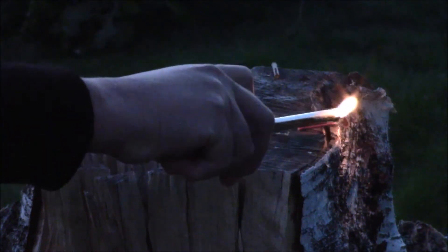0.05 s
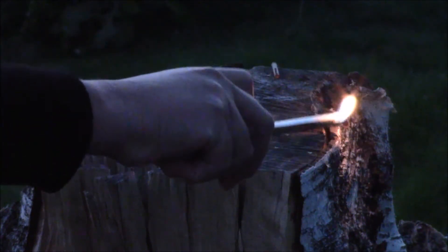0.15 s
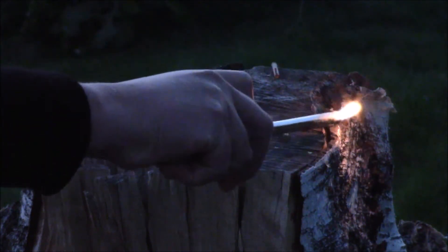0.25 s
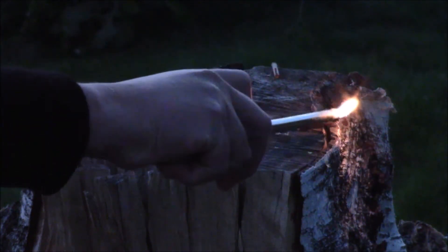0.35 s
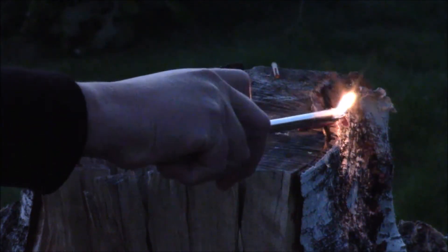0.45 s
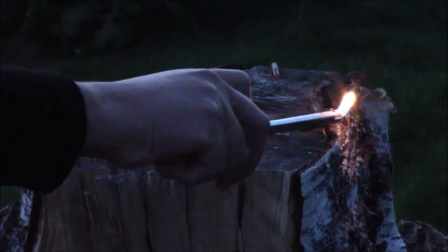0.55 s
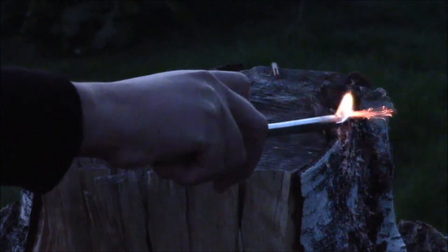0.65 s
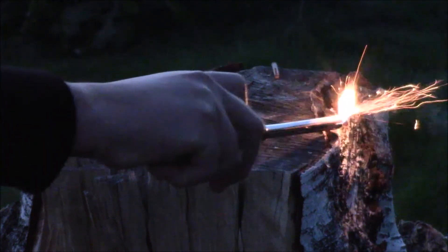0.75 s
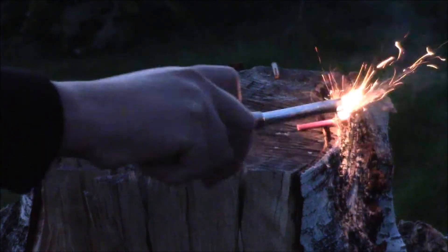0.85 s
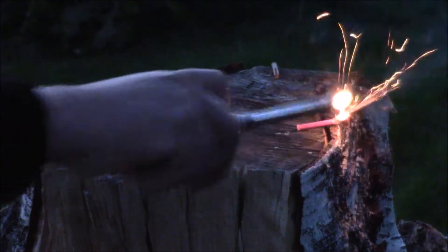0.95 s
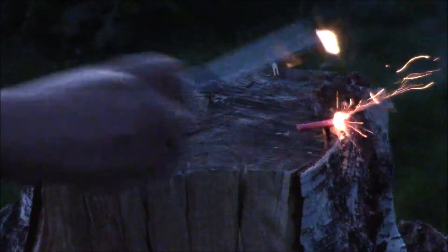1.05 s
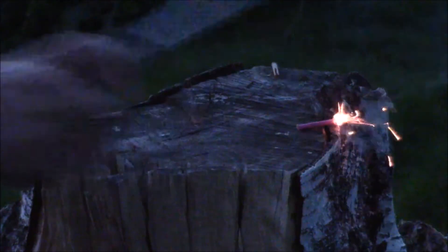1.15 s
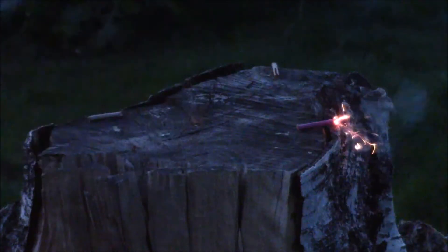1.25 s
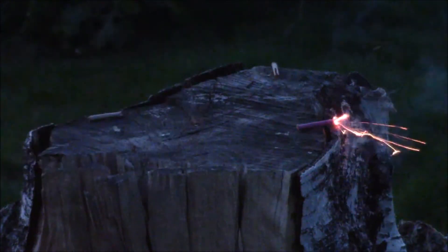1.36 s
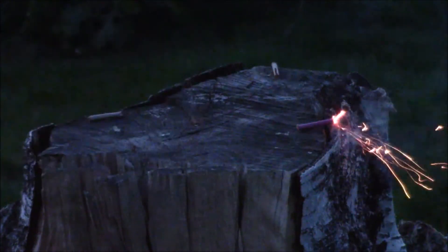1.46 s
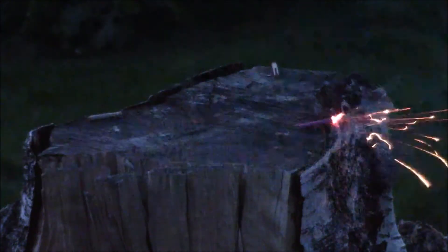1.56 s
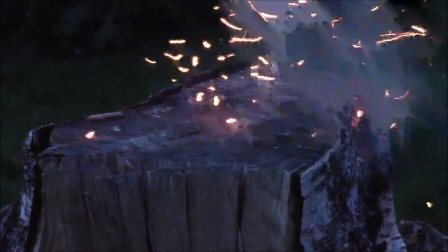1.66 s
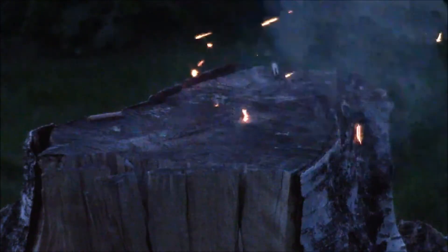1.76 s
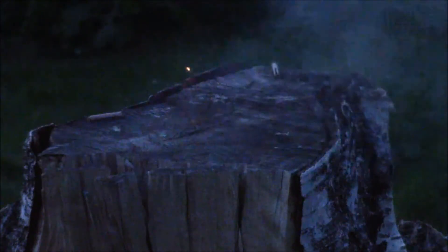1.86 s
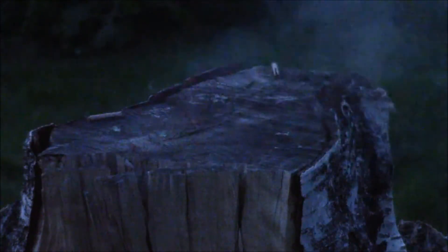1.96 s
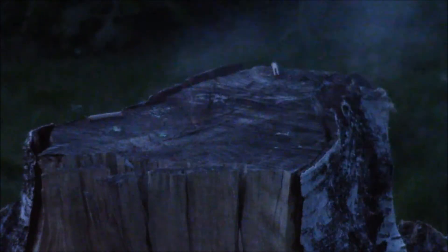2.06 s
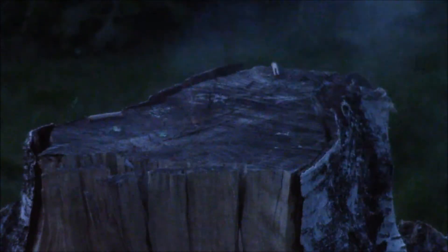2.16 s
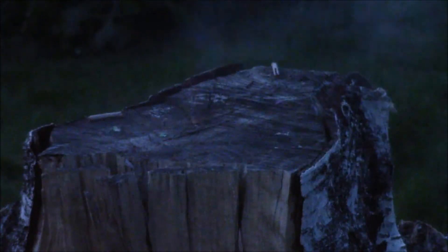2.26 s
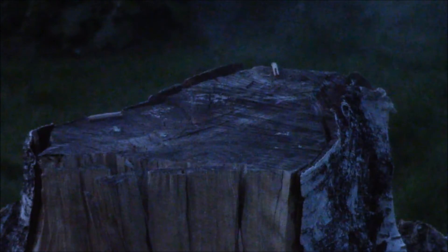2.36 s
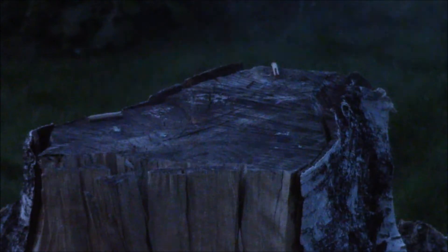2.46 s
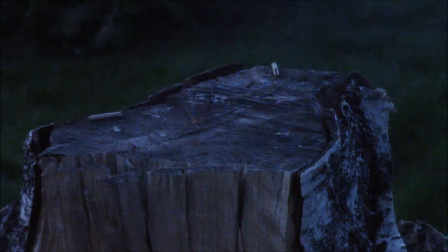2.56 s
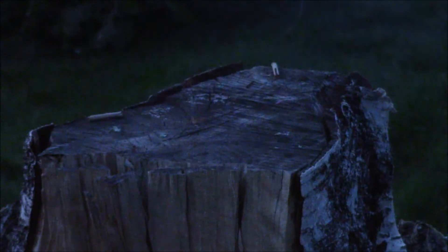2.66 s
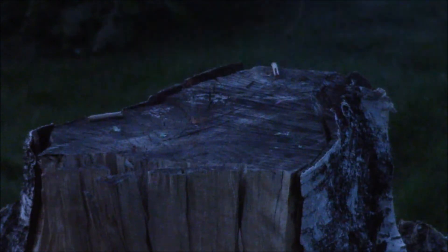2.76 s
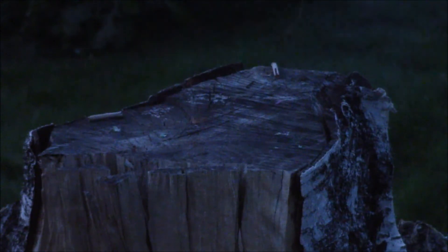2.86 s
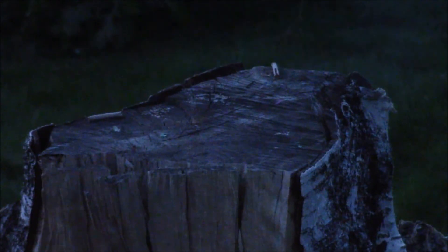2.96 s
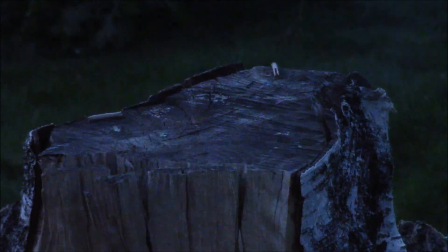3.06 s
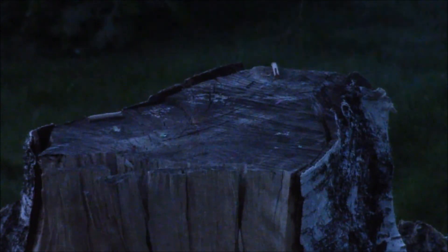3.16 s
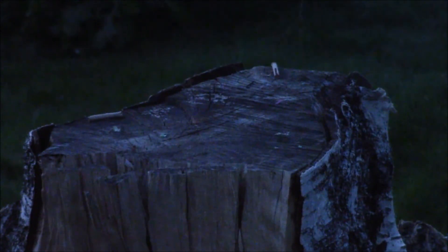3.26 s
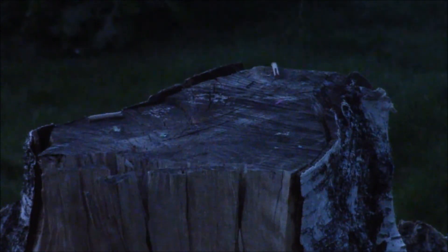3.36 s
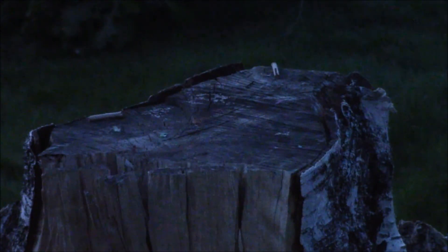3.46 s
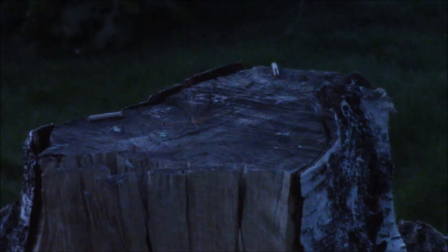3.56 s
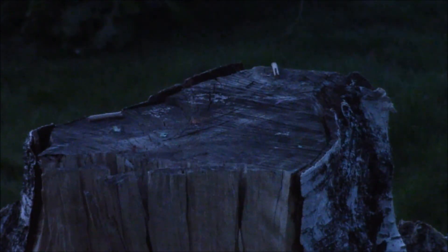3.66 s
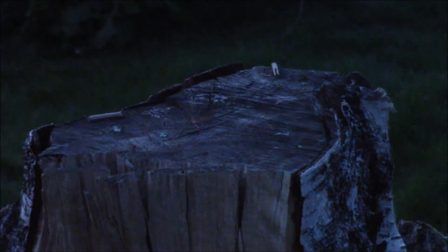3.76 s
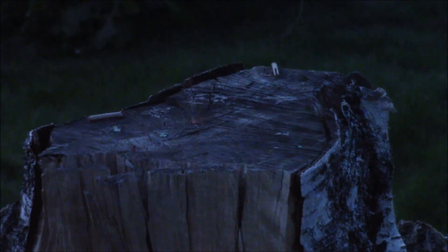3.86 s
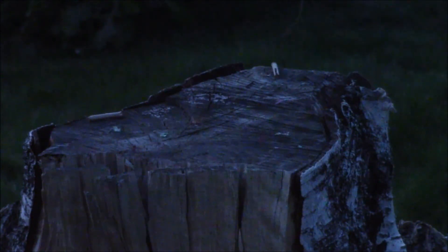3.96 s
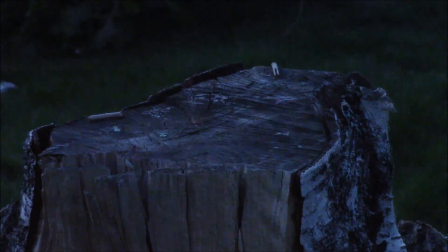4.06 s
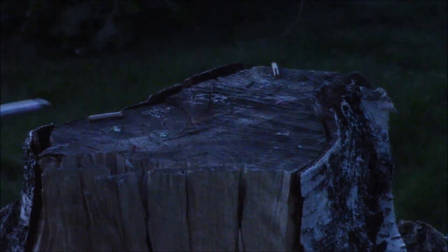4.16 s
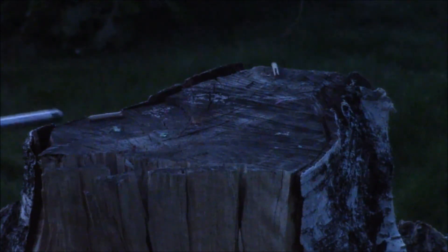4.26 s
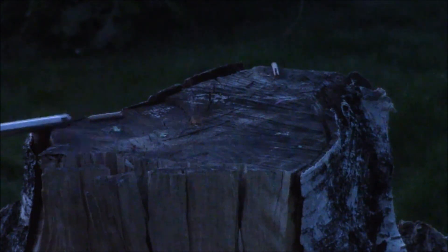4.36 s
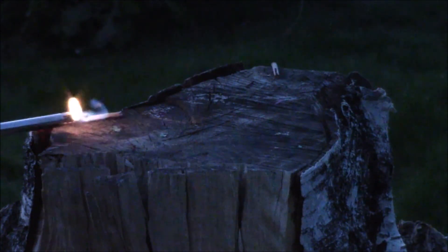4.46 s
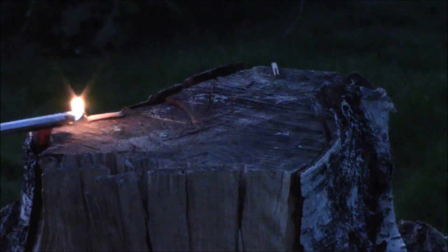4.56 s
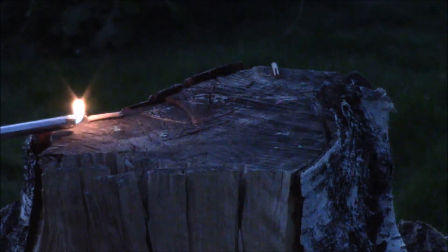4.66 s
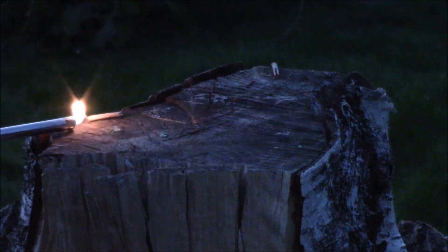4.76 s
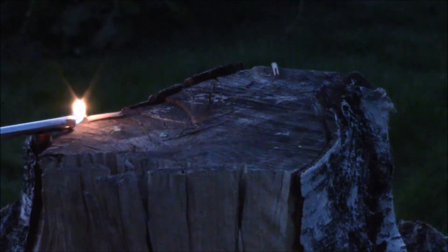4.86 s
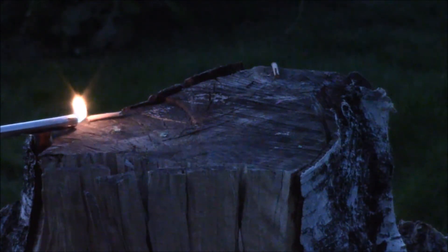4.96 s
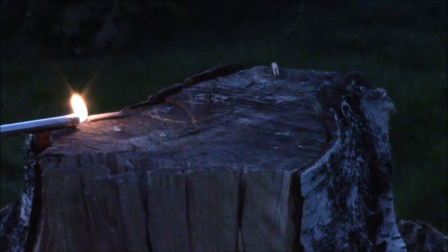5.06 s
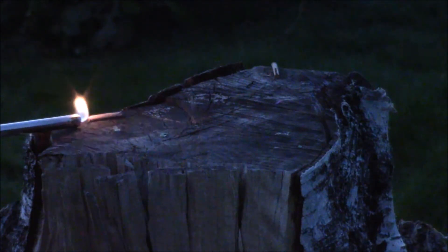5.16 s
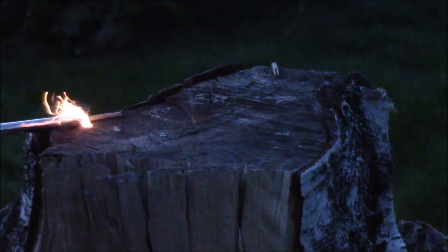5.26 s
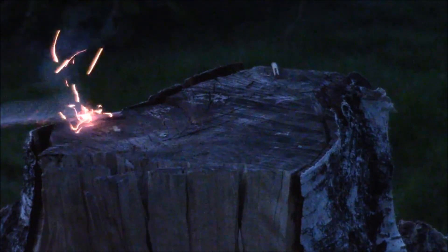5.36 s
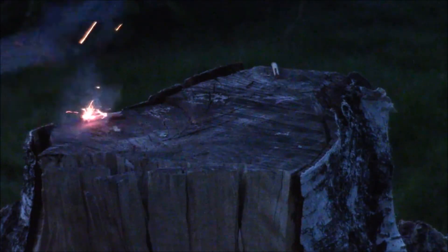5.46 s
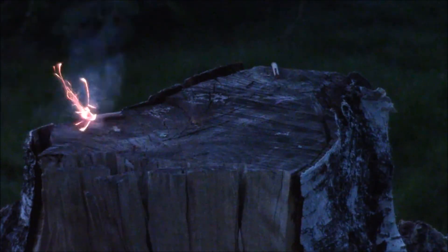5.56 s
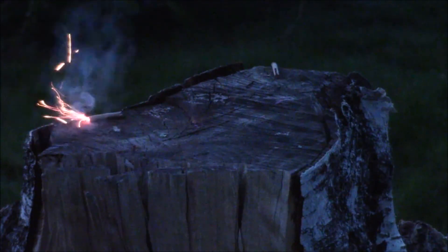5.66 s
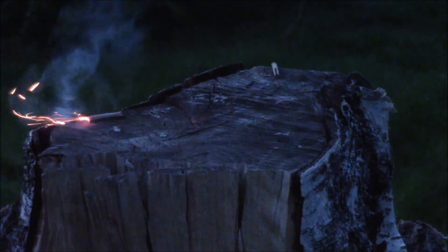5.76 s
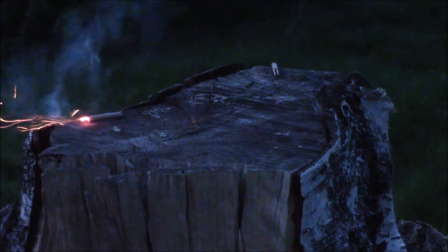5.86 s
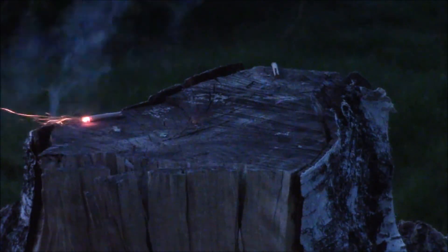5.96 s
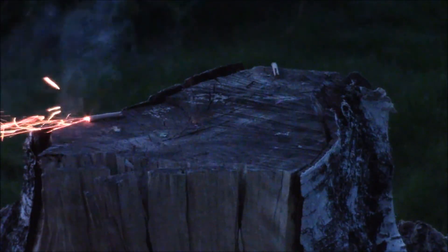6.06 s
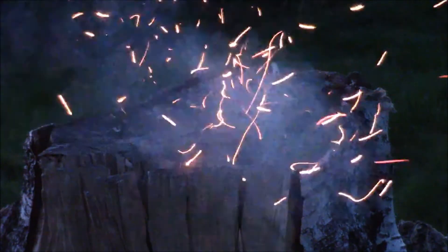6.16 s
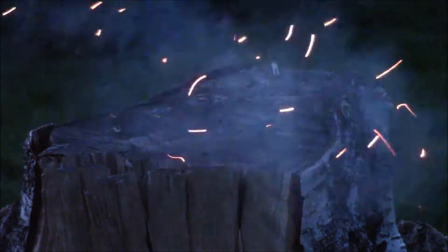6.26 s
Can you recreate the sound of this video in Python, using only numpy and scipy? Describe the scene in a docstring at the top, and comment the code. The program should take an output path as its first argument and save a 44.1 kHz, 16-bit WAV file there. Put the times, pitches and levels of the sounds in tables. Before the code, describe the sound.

Two firecrackers outdoors, each a sputtering bright fuse hiss ending in a sharp overloaded crack with slapping echoes, separated by quiet and lighter clicks.

```python
"""Two firecrackers in a garden

Two small firecrackers on a tree stump. Each fuse is a jet of shaped noise with spits; each blast is a pressure
front, a ground heave and scattered noise that overloads the recorder, with a brief pre-echo. Walls and trees return
slaps and a dulling roll. Between the blasts a gas lighter clicks as ringing modes; dry ticks sound nearby, far
traffic hums below."""
import sys
import numpy as np
from scipy import signal
from scipy.io import wavfile

SR = 44100
rng = np.random.default_rng(int(sys.argv[2]) if len(sys.argv) > 2 else 0)


def log_audio(samples):
    """Write samples as a 16-bit WAV file to the path given in sys.argv[1]."""
    # one column per channel
    frames = np.atleast_2d(samples).T
    # limit to full scale, then quantise
    limited = np.clip(frames, -1, 1)
    pcm = np.round(limited * 32767).astype(np.int16)
    wavfile.write(sys.argv[1], SR, pcm)


def gain_from_db(level_db):
    """Convert decibel levels to linear amplitude factors (20 dB per decade)."""
    decades = np.asarray(level_db, float) / 20
    return 10 ** decades


N = 277973
SIDES = np.array([[1], [-1]])   # left, right

# left-right likeness of far and near sound: f/Hz, likeness/0..1
FAR_LIKENESS = [(60, 1), (240, 0.6), (950, 0.82), (3770, 0.65), (15000, 0.59)]
NEAR_LIKENESS = [(60, 1), (240, 0.87), (950, 0.987), (3770, 0.9445), (15000, 1)]

# far traffic spectrum: f/Hz, density/dB per Hz (relative)
TRAFFIC_SPECTRUM = [(26, -32.5), (45, -1.5), (120, -4.5), (250, -6), (440, -4), (498, -6.5), (606, -5),
                    (813, -5.5), (942, -7), (2390, -18), (6700, -23), (15800, -30.5)]
# far cars passing: t/s, half length/s, level near tyre pitch/dB, level over all/dB
CAR_PASSES = [(0.357, 0.192, 8.5, 0), (2.7, 0.87, -0.5, 1.5), (6.3, 2.2, 3.5, 0.5)]
TRAFFIC_DB, TYRE_HZ, TYRE_OCTAVES = -52, 900, 0.19

# faint dry ticks nearby: t/s, peak/dB
TICKS = [(0.5053, -39.5), (2.948, -42), (3.1667, -39), (3.2281, -39.5), (3.3665, -45), (3.5019, -43),
         (3.5985, -43.5), (4.2374, -38.5), (4.2996, -45), (4.9899, -47)]
TICK_HZ, TICK_T60_S = 4150, 0.0173

# burning fuses: lit/s, out/s, first flare/dB, steady burn/dB, climb towards the charge/dB per s
FUSES = [(0.719, 1.63, -52, -65.5, 13), (5.266, 6.137, -50.5, -64.5, 7)]
# jet hiss and roar spectra: f/Hz, density/dB per Hz (relative)
HISS_SPECTRUM = [(3500, -24), (4700, -9), (6700, 5), (9500, 5), (13400, -7), (17000, -7)]
ROAR_SPECTRUM = [(900, -8.5), (1600, -3), (2500, -2.5), (4000, -4), (6000, -21)]
# jet flares where the powder is richer: t/s, length/s, level/dB
FLARES = [(1.456, .04, 9.5), (5.699, 0.354, 4.5), (6.039, .1, 10)]
# fuse spits: t/s, peak/dB, centre f/Hz
SPITS = [(.8445, -33.5, 2820), (.8894, -41.5, 2230), (.914, -41.5, 1900), (0.9947, -33, 2270),
         (1.0944, -29, 3290), (1.099, -28.5, 2270), (1.122, -32.5, 5500), (1.138, -32, 2580),
         (1.4735, -44, 5000), (1.5064, -36, 2200), (1.5385, -39, 2790), (5.273, -37, 3121),
         (5.41, -34, 2050), (5.5056, -30.5, 1330), (5.567, -29, 2770), (5.6375, -34.5, 1900),
         (5.827, -43, 1820), (6.02, -38.5, 2210), (6.038, -40, 2250)]
CATCH_S, FIRST_FLARE_T60_S, FLARE_EDGE_S, SPIT_T60_S = 0.01, 2.754, 0.012, 0.049
ROAR_DB, ROAR_FADE_DB_PER_S, AIRY_DB_PER_OCTAVE_S = -1, 6.5, 11.5

# pre-echo, bright noise smeared ahead of each bang: end t/s, end level/dB, rise/dB per s
PRE_ECHOES = [(1.6391, -11, 898.5), (6.1457, -14, 3500)]
# pre-echo spectrum: f/Hz, density/dB per Hz (relative)
PRE_ECHO_SPECTRUM = [(600, -5.5), (1500, -3), (3500, 1.5), (6000, -3), (10500, -1), (13000, -2.5),
                     (15500, -14)]

# blasts: t/s, pressure/dB, positive phase/ms, lean/dB (left +, right -), all that is thrown back/dB
BLASTS = [(1.6397, 33, 0.5, -1.5, 0), (6.1472, 29.5, .33, 5, -1)]
# ground heave after each blast: level/dB, f/Hz, lean/dB (left +, right -)
HEAVES = [(22, 53, -0.5), (7.96, 74, -1.5)]
# noise thrown off stump and ground: f/Hz, density/dB per Hz (relative)
SCATTER_SPECTRUM = [(150, -5), (500, -1), (1500, 2.5), (3000, -5), (6000, -10.5), (11000, -15.5),
                    (16000, -26)]
SCATTER_DB, SCATTER_T60_S = 25, 0.06

# hard surfaces returning slaps: delay/s, level/dB
SLAPS = [(.0518, 5), (0.0549, 3), (0.0717, 12.5), (.0815, 8), (.085, 11), (0.0897, 8.5), (.1, -1.5),
         (.1235, -8), (.1724, 0.5), (.179, -7.5), (.204, -18.5), (.234, -11), (.413, -26.5)]
# hedges, trees, far walls: delay of top/s, level/dB, rise over 60 dB/s, t60/s, treble tilt/dB per octave
THICKETS = [(.015, -8, 0.62, .045, 0), (.045, -14.5, 0.39, .33, 11.5), (.075, -6.5, 0.04, .2, -3.5),
            (.176, -19.5, 0.2442, .08, -9), (.207, -22, 0.09, 0.1521, -2.5), (.236, -20.5, 0.34, .23, 5),
            (.3, -34.5, 1, 1.6, 1), (0.598, -46.5, 3.0, 4.52, -2.5), (.92, -52.5, 0.02, 0.53, 16)]
# echo roll spectrum: f/Hz, density/dB per Hz (relative)
ROLL_SPECTRUM = [(35, -47), (60, -25), (210, -20.5), (291, -21), (1120, -7.5), (1830, -7.5), (2470, -8.5),
                 (7030, -24.5), (12000, -41), (15500, -69)]
AIR_DB_PER_OCTAVE_S = 15.5   # treble loss grows with travel time

# lighter trigger, spark snap, after-rattle: t/s, contact level/dB, steady part/s, t60/s
LIGHTER_SNAPS = [(4.3406, -29.5, 0.00073, 0.0238), (4.4732, -15, .005, 0.013),
                 (4.4846, -47.5, 0.0015, 0.118)]
# plastic and metal body of the lighter: f/Hz, level/dB, t60/s
LIGHTER_MODES = [(1040, -14.5, 0.0069), (1405, -8, 0.00507), (2175, -6, 0.0116), (3125, -35.5, 0.099),
                 (3336, -11.5, 0.0042), (4397, -9, 0.00526), (5914, -9, 0.00312), (7690, -6.5, 0.00261),
                 (9820, -5, 0.00196), (12930, -7, 0.00089)]

LIMIT_DB, ATTACK_S, RELEASE_DB_PER_S = -3, 0.0037, 250
TOP_HZ, OFFSET = 16200, 0.0091


def rms_one(x):
    """Scale to rms 1."""
    return x / np.sqrt(np.mean(x ** 2) + 1e-20)


def at_hz(points, hz):
    """Read a table on a log-frequency axis."""
    table_hz, values = np.transpose(points)
    return np.interp(np.log(hz), np.log(table_hz), values)


def power_sum(db):
    """Rows of dB added as powers."""
    return 10 * np.log10(np.sum(gain_from_db(db) ** 2, axis=0) + 1e-20)


def gate(start_s, end_s, edge_s):
    """0 outside, 1 inside, with straight edges."""
    t = np.arange(N) / SR
    return np.clip(np.minimum(t - start_s, end_s - t) / edge_s, 0, 1)


def add(out, x, s):
    """Mix x in at time s."""
    i = round(s * SR)
    out[..., i:i + x.shape[-1]] += x[..., :out.shape[-1] - i]


def drift(corner_hz, size):
    """Slow random curve of rms 1 at its knots: one-pole noise at 200 knots per s, joined by lines."""
    knots = rng.standard_normal(int(size / SR * 200) + 2)
    r = np.exp(-2 * np.pi * corner_hz / 200)
    slow = rms_one(signal.lfilter([1], [1, -r], knots))
    return np.interp(np.arange(size) / SR * 200, np.arange(len(knots)), slow)


def coloured(spectrum, likeness, size, extra_db=lambda hz: 0, patchy_db=0, grain_db=0):
    """Half-octave bands of stereo noise; rms 1 before the extra and patchy gains of each band."""
    edges_hz = 22 * 2 ** np.arange(0, 9.6, 0.5)
    grains = gain_from_db(grain_db * np.minimum(rng.exponential(1, size), 4))
    white = rng.standard_normal((2, 2, size)) * grains
    out, power = 0, 0
    for k, (low, high) in enumerate(zip(edges_hz, edges_hz[1:])):
        hz = np.sqrt(low * high)
        if not spectrum[0][0] / 1.5 < hz < spectrum[-1][0] * 1.5:
            continue
        sos = signal.butter(2, [low, high], "band", fs=SR, output="sos")
        mid, side = signal.sosfilt(sos, white[k % 2])   # neighbouring bands use separate noise
        alike = np.clip(at_hz(likeness, hz), 0, 1)
        stereo = np.sqrt(1 + alike) * mid + np.sqrt(1 - alike) * side * SIDES
        band = gain_from_db(at_hz(spectrum, hz)) * stereo
        power += np.mean(band ** 2)
        out = out + band * gain_from_db(extra_db(hz) + patchy_db * drift(12, size))
    return out / np.sqrt(power)


def puffs(events, wide):
    """Short dying band noise from (t/s, peak/dB, f/Hz, t60/s), rising over about 1 ms or less."""
    out, t = np.zeros(N), np.arange(3000) / SR
    for s, db, hz, t60 in events:
        edges_hz = [hz / wide, min(hz * wide, 0.45 * SR)]
        shape = gain_from_db(-60 * t / t60) * np.minimum(t / (0.0215 * t60), 1)
        sos = signal.butter(2, edges_hz, "band", fs=SR, output="sos")
        puff = signal.sosfilt(sos, rng.standard_normal(3000) * shape)
        add(out, gain_from_db(db) * puff / np.abs(puff).max(), s)
    return out


def traffic():
    """Far tyres and engines plus microphone hiss: one noise bed, swelling near the tyre pitch as cars pass."""
    s, half_s, tyre_db, db = np.transpose(CAR_PASSES)[..., None]
    near = np.exp(-((np.arange(N) / SR - s) / half_s) ** 2)
    tyres_db = np.sum(tyre_db * near, axis=0)
    all_db = np.sum(db * near, axis=0)

    def swell_db(hz):
        return all_db + tyres_db * np.exp(-(np.log2(hz / TYRE_HZ) / TYRE_OCTAVES) ** 2)

    return gain_from_db(TRAFFIC_DB) * coloured(TRAFFIC_SPECTRUM, FAR_LIKENESS, N, swell_db, patchy_db=0.9455)


def ticks():
    """Dry ticks: very short puffs of noise, all around one pitch."""
    return puffs([(s, db, TICK_HZ, TICK_T60_S) for s, db in TICKS], wide=2.33)


def fuses():
    """A bright gas jet over a rougher roar, silent outside the burns; spits on top."""
    t, level, burnt_s = np.arange(N) / SR, np.zeros(N), np.zeros(N)
    for lit_s, out_s, first_db, steady_db, climb in FUSES:
        since = np.clip(t - lit_s, 0, out_s - lit_s)
        burning = gate(lit_s, out_s, CATCH_S)
        flare_dying_db = first_db - 60 * since / FIRST_FLARE_T60_S
        level += burning * gain_from_db(power_sum([flare_dying_db, steady_db + climb * since]))
        burnt_s += since * (burning > 0)
    flare_db = sum(db * gate(s, s + length, FLARE_EDGE_S) for s, length, db in FLARES)

    def airy_db(hz):   # hiss brightens above 9 kHz as the fuse burns
        return AIRY_DB_PER_OCTAVE_S * burnt_s * max(np.log2(hz / 9000), 0)

    hiss = coloured(HISS_SPECTRUM, NEAR_LIKENESS, N, airy_db, patchy_db=2.5, grain_db=4.5)
    roar = coloured(ROAR_SPECTRUM, NEAR_LIKENESS, N, patchy_db=4.0, grain_db=4.5)
    roar = roar * gain_from_db(ROAR_DB - ROAR_FADE_DB_PER_S * burnt_s)
    spits = puffs([(*spit, SPIT_T60_S) for spit in SPITS], wide=2.043)
    return level * gain_from_db(flare_db) * (hiss + roar) + spits


def pre_echo():
    """Pre-echo: bright noise smeared ahead of each bang, rising at a steady dB rate."""
    out, to_end_s = np.zeros((2, N)), np.arange(4096)[::-1] / SR
    for s, db, rise in PRE_ECHOES:
        smear = coloured(PRE_ECHO_SPECTRUM, NEAR_LIKENESS, 4096)
        add(out, smear * gain_from_db(db - rise * to_end_s), s - 4096 / SR)
    return out


def blasts():
    """Steep front and long suction phase, a half-sine ground heave, dying noise off stump and ground."""
    out, t = np.zeros((2, N)), np.arange(4096) / SR
    for (s, db, phase_ms, pan_db, back_db), (heave_db, heave_hz, lean_db) in zip(BLASTS, HEAVES):
        phase = t * 1000 / phase_ms   # pressure crosses zero at 1
        add(out, gain_from_db(db + pan_db * SIDES) * (1 - phase) * np.exp(-0.8 * phase), s)
        heave = np.sin(2 * np.pi * np.minimum(t * heave_hz, 0.5))
        add(out, gain_from_db(heave_db + lean_db * SIDES) * heave, s + 0.0013)
        scatter = coloured(SCATTER_SPECTRUM, NEAR_LIKENESS, 4096, lambda hz: -60 * t / SCATTER_T60_S)
        add(out, gain_from_db(SCATTER_DB + back_db) * scatter * np.minimum(t / 0.002, 1), s)
    return out


def garden_echo():
    """What a click sends back: rough slaps over a lumpy roll that loses its treble."""
    size = round(1.6 * SR)
    since = np.arange(size) / SR
    top_s, db, rise_s, t60, tilt_db = np.transpose(THICKETS)[..., None]
    swells_db = db - 60 * np.maximum((top_s - since) / rise_s, (since - top_s) / t60)
    # many trunks and branches, unevenly spaced
    lumps_db = 2.1 * drift(70, size) * np.exp(-since / 0.9)

    def roll_db(hz):
        octaves = np.log2(1 + (hz / 4000) ** 2) / 2   # tilt sets in around 4 kHz
        return lumps_db + power_sum(swells_db + (tilt_db - AIR_DB_PER_OCTAVE_S * since) * octaves)

    roll = coloured(ROLL_SPECTRUM, NEAR_LIKENESS, size, roll_db, patchy_db=1.5, grain_db=3.5)
    clicks, t = np.zeros((2, size)), np.arange(300) / SR
    for s, slap_db in SLAPS:
        chance = rng.standard_normal(300)
        # an uneven wall smears the slap
        rough = signal.unit_impulse(300) + 0.14 * chance * gain_from_db(-60 * t / 0.015)
        add(clicks, gain_from_db(slap_db + chance[0] * SIDES) * rough, s)   # random lean, 1 dB spread
    wall = np.vstack([signal.butter(2, [400, 2200], "band", fs=SR, output="sos"),
                      signal.butter(2, 7000, fs=SR, output="sos")])
    peak = signal.sosfilt(wall, signal.unit_impulse(64)).max()
    return roll - signal.sosfilt(wall, clicks + 1e-18) / peak


def resonate(x, hz, t60):
    """A unit click sets a dying sine of starting height 1 ringing."""
    r, w = gain_from_db(-60 / (t60 * SR)), 2 * np.pi * hz / SR
    return signal.lfilter([0, np.sin(w)], [1, -2 * r * np.cos(w), r * r], x)


def lighter():
    """Each snap is a quick rattle of tiny contacts that rings the body modes."""
    rattle, t = np.zeros(N), np.arange(4000) / SR
    for s, db, hold_s, t60 in LIGHTER_SNAPS:
        contacts = rng.standard_normal(4000) * (rng.random(4000) < 0.3)
        add(rattle, gain_from_db(db - 60 * np.maximum(t - hold_s, 0) / t60) * contacts, s)
    rung = np.zeros(N)
    for k, (hz, db, t60) in enumerate(LIGHTER_MODES):
        rung += gain_from_db(db) * (-1) ** k * resonate(rattle + 1e-18, hz, t60)
    return signal.sosfilt(signal.butter(2, [600, 15500], "band", fs=SR, output="sos"), rung)


def scene():
    """All sources; blasts and lighter come back from the garden."""
    echo, snaps = garden_echo(), lighter()
    out = traffic() + ticks() + fuses() + pre_echo() + blasts() + snaps
    for s, _, _, _, back_db in BLASTS:
        add(out, gain_from_db(back_db) * echo, s)
    first_s = LIGHTER_SNAPS[0][0]
    near = snaps[round(first_s * SR):][:8192]
    add(out, gain_from_db(-65) * signal.fftconvolve(echo, near[None], axes=1), first_s)
    return out


def gain_control(x):
    """Gain falls within milliseconds of an overload and climbs back at a steady rate."""
    over_db = 20 * np.log10(np.abs(x).max(axis=0) + 1e-9) - LIMIT_DB
    ramp_db = RELEASE_DB_PER_S * np.arange(N) / SR
    held_db = np.maximum(np.maximum.accumulate(over_db + ramp_db) - ramp_db, 0)
    r = np.exp(-1 / (ATTACK_S * SR))
    return x * gain_from_db(-signal.lfilter([1 - r], [1, -r], held_db))


def band_limit(x):
    """A steep low-pass at the top of the band."""
    return signal.sosfilt(signal.butter(12, 16090, fs=SR, output="sos"), x)


def record(dry):
    """Bass cut at the microphones, gain control too slow to stop the overload, steep top cut, small offset."""
    x = signal.sosfilt(signal.butter(1, 22, "high", fs=SR, output="sos"), dry)
    x = gain_control(x)
    x = x / (1 + np.abs(x) ** 4) ** 0.25   # soft clipping
    x = signal.sosfilt(signal.cheby2(10, 50, TOP_HZ, fs=SR, output="sos"), x)
    return band_limit(x * 0.8164 + OFFSET)


dry = scene()
out = record(dry)
log_audio(out)
```